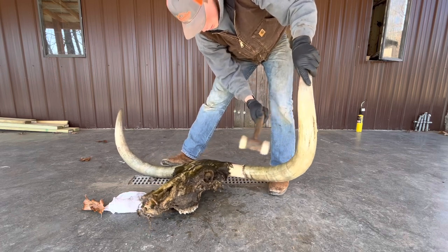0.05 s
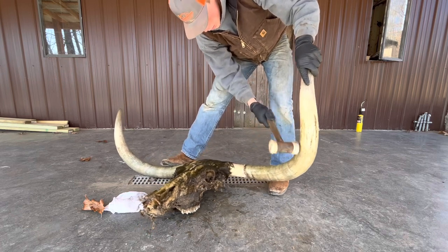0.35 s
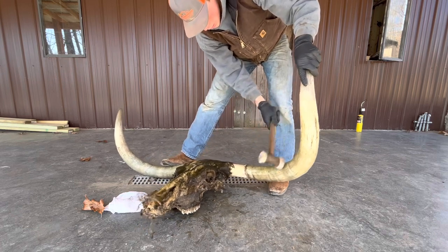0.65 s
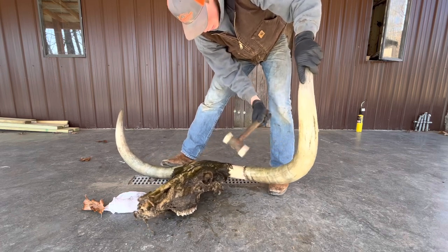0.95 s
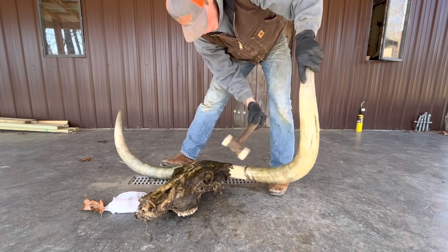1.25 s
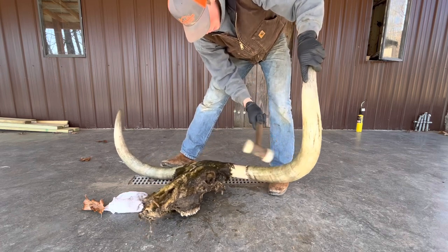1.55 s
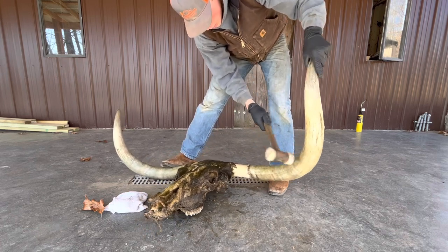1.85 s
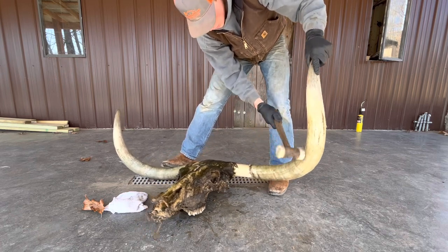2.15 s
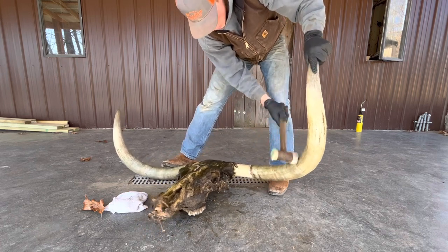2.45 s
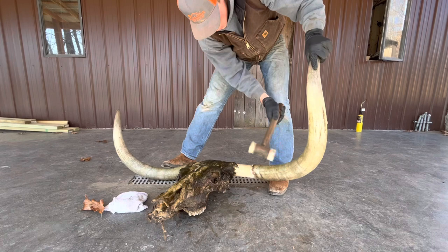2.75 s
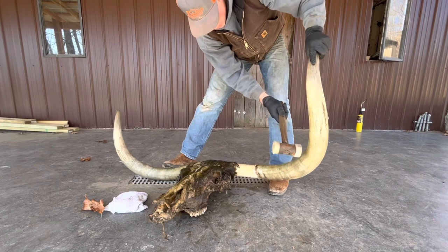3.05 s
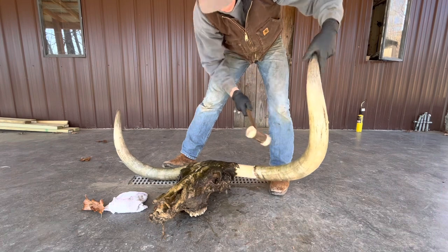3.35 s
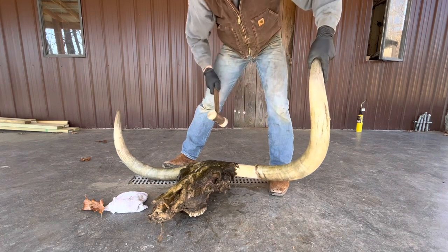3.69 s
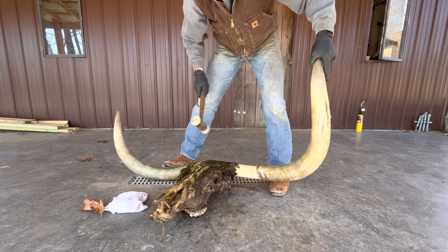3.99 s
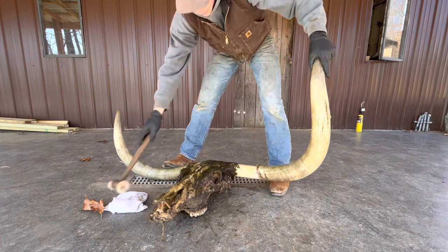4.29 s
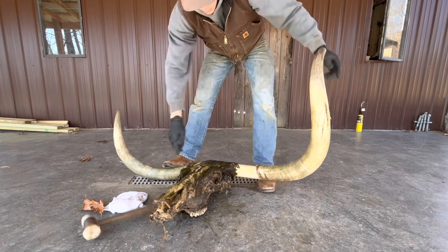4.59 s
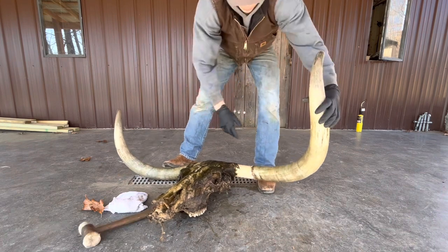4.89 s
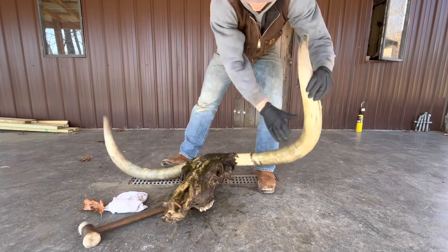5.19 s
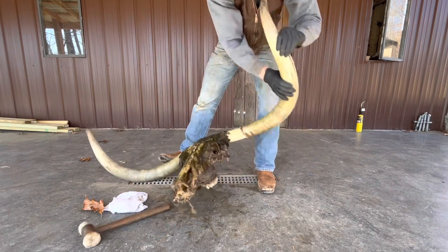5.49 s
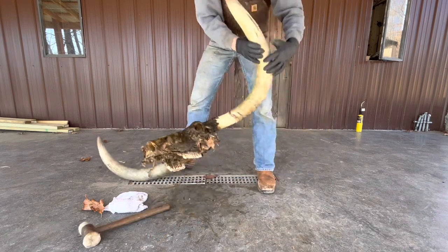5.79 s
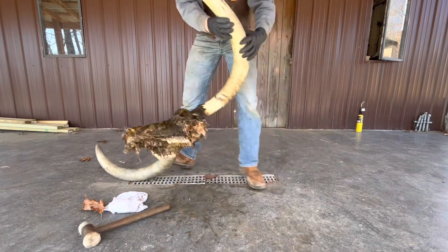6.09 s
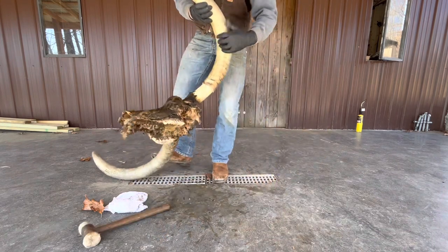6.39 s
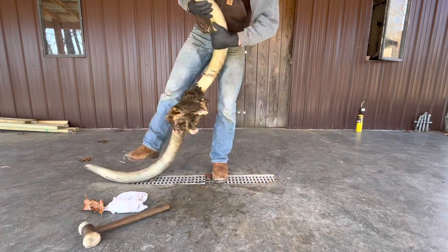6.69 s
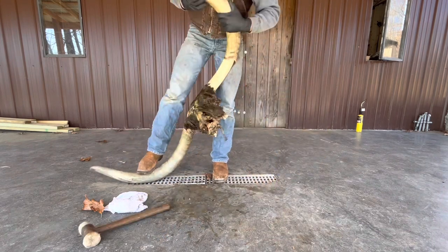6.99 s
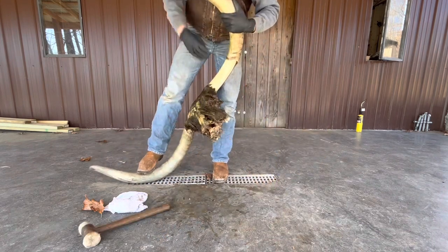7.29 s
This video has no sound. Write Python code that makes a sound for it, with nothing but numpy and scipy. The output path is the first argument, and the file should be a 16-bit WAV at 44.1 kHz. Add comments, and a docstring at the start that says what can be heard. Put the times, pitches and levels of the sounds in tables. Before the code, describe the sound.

Eight steady mallet blows on horn ring through a shed, followed by a dropped mallet and soft knocks, scrapes and clothing rustle.

```python
"""In a hard-walled shed, a cattle skull lies on concrete before a sheet-metal wall. A wooden mallet
strikes its horn eight times; each impact excites damped modes and drives the skull against the floor.
The skull rocks, the mallet drops and clatters, then the skull is lifted and swung round on the tip of
its other horn. Friction gives the noise of a drain grate, scrapes and work clothes, and grit snaps.
Reflections and reverberation answer each contact, over faint hiss and distant rumble."""
import sys
import numpy as np
from scipy import signal
from scipy.fft import rfft, irfft, next_fast_len
from scipy.io import wavfile
from scipy.ndimage import uniform_filter1d

SR = 44100
rng = np.random.default_rng(int(sys.argv[2]) if len(sys.argv) > 2 else 0)


def int16_out(signal):
    """Quantize to a 16-bit WAV file."""
    q = np.round(np.clip(np.atleast_2d(signal).T, -1, 1) * 32767)
    wavfile.write(sys.argv[1], SR, q.astype(np.int16))


N = 328104
TIME, HZ = np.arange(N) / SR, np.fft.rfftfreq(N, 1 / SR)
HIT = 16384  # samples in one impact
HIT_TIME, HIT_HZ = TIME[:HIT], np.fft.rfftfreq(HIT, 1 / SR)


# Each row: start in seconds, relative levels in dB of the blow, its thud, skull knock and treble crack,
# resonance of the struck spot in Hz, its lift in dB.
BLOWS = [(.2310, -1, -1.5, -8, -1.5, 1370, -1.5), (0.6383, 1, -6, -8.5, -3.5, 1180, -1),
         (1.014, -1.5, 0.5, -5.5, -0.5, 1310, 0), (1.3617, 0.5, -3.5, -6.5, -3, 1140, -2),
         (1.721, -1.5, -2, -3, 1, 1830, 0), (2.079, -3, .5, 0.5, 1, 2380, 4.5),
         (2.445, -4.5, .5, 0, 4.5, 2060, 5), (2.8094, -2.5, -1.5, -4.5, -3, 2160, 3)]
# Each row: frequency in Hz, relative level in dB, 60 dB decay time (T60) in seconds.
HORN_MODES = [(158, 1, 0.041), (204, 1, 0.024), (273, -1.5, 0.097), (339, -2, 0.11), (370.4, -3, 0.12),
              (430, -6.5, 0.081), (563, -6, 0.12), (638, -8, 0.041), (910, -29, 0.067), (1140, -2.5, 0.038),
              (1356, 3.5, 0.042), (1660, -9.5, 0.045), (1680, -5.5, 0.013), (2070, -17, 0.015),
              (2490, -35, 0.022), (2634, 9.5, 0.014)]
# Wood on horn. Each row, as in every SPECTRUM table: frequency in Hz, relative spectral density in dB.
CRACK_SPECTRUM = [(50, -20.5), (200, -10.5), (400, 0), (700, 2.5), (1700, 1.5), (2200, -1), (3000, -3.5),
                  (5200, -8.5), (7000, -4.5), (9000, -11), (12000, -14), (14000, -24), (16000, -61)]
# Each row: frequency in Hz, T60 in seconds.
CRACK_T60 = [(300, 0.028), (1500, 0.032), (4000, 0.027), (8000, 0.014)]

def horn_blows():
    """Impact excitation: a crack and the horn's modes. Returns direct sound and sound for the walls."""
    direct, spread, skull = np.zeros((3, 2, N))
    crack_db = curve(CRACK_SPECTRUM, HIT_HZ)
    common = decaying_noise(CRACK_T60, HIT)  # the part of the crack that all blows share
    contact = 1 - np.exp(-HIT_TIME / 0.00025)  # the mallet's face gives a little
    smooth_crack = unit(filtered(signal.unit_impulse(HIT), crack_db))  # ripple averaged over directions
    bass_db = -10 * np.log10(1 + (58 / (HIT_HZ + 5)) ** 6)  # a small body radiates little deep bass
    for start, db, thud_db, knock_db, treble_db, spot_hz, lift_db in BLOWS:
        modes = common + 1.92 * decaying_noise(CRACK_T60, HIT)
        crack = unit(coloured(modes * contact, crack_db, smooth_hz=645))
        horn = amp(7) * ring(HORN_MODES, scatter=0.35)
        shelf_db = treble_db * HIT_HZ ** 2 / (HIT_HZ ** 2 + 3500 ** 2)
        spot_db = lift_db / (1 + ((HIT_HZ - spot_hz) / 330) ** 2)
        tone_db = db + bass_db + shelf_db + spot_db
        add(direct, start, filtered(amp(14) * crack + horn, tone_db))
        add(spread, start, filtered(amp(10.5) * smooth_crack + amp(8.5) * crack + horn, tone_db))
        add(skull, start, skull_on_floor(db + knock_db, db + thud_db, bass_db))
        add(direct, start, wall_slaps(db))
    return direct + skull, spread + amp(-12.5) * skull


# The hollow knock. Each row: frequency in Hz, density in dB.
SKULL_SPECTRUM = [(60, -32), (130, -4), (170, 3), (230, -11), (280, -10), (340, -0.5), (440, 0.5),
                  (490, -10.5), (570, 3.5), (800, -17), (2000, -36), (8000, -62)]
# Each row: frequency in Hz, relative level in dB, T60 in seconds.
THUD_MODES = [(82, -1.5, 0.11), (117, 4.7, 0.071)]

def skull_on_floor(knock_db, thud_db, bass_db):
    """Momentum transfer: just after a blow the skull meets the floor with a hollow knock and a thud."""
    out = np.zeros((2, N))
    knock_lag_s, thud_lag_s = 0.01072, 0.01327
    knock = coloured(decaying_noise([(300, 0.052)], HIT), curve(SKULL_SPECTRUM, HIT_HZ), smooth_hz=80)
    thud = filtered(ring(THUD_MODES), bass_db)
    add(out, knock_lag_s, amp(knock_db + 16.5) * unit(knock))
    add(out, thud_lag_s, -amp(thud_db + 8) * unit(thud))
    return out


# Each row: start in seconds, relative levels in dB of head, handle and hollow bounce.
DROPS = [(4.534, 5, -10.5, -35), (4.562, 0, -14, -40), (4.6009, -26, 2.5, -31), (4.6135, -24, -6, -22),
         (4.637, -26, -3, -12.5), (4.7246, -3, -6, -40)]
# The mallet's two parts. Each row: frequency in Hz, density in dB.
HEAD_SPECTRUM = [(40, -23), (100, 7.5), (200, -5), (400, -0.5), (750, -0.5), (1100, 4.5), (1900, -15),
                 (2900, -11), (3700, 4.5), (4800, -14), (10000, -20.5), (15000, -35)]
HANDLE_SPECTRUM = [(100, -18), (600, -4.5), (1200, -4), (2500, 4.5), (4200, -0.5), (5700, -3), (7500, -12),
                   (10000, -18.5), (15000, -49)]
# Each row: frequency in Hz, relative level in dB, T60 in seconds.
HANDLE_MODES = [(1870, 0, 0.34), (2213, -23, 0.28), (2700, -23, 0.25), (2730, -10, 0.27), (3160, 0, 0.45),
                (4000, -14, 0.13), (4180, 29.5, 0.012), (5230, -1, 0.038)]

def dropped_mallet():
    """Rebound: the head lands and bounces, then the handle slaps the concrete and vibrates freely."""
    head, handle = np.zeros((2, 2, N))
    for start, head_db, handle_db, bounce_db in DROPS:
        add(head, start, amp(head_db + 1) * burst(curve(HEAD_SPECTRUM, HIT_HZ), t60=0.018))
        add(head, start, amp(bounce_db + 11.5) * ring([(343, 0, 0.032)]))
        slap = burst(curve(HANDLE_SPECTRUM, HIT_HZ), t60=0.018)
        add(handle, start, amp(handle_db + 5) * (slap + amp(-6.5) * ring(HANDLE_MODES, scatter=0.2)))
    leftward = amp([[0.34], [-0.34]])
    return head * leftward, handle * leftward


# Each row: start in seconds, relative level in dB, hollow pitch in Hz, brightness in dB.
BUMPS = [(3.080, -2.5, 347, -6.5), (3.118, -7, 302, 5), (3.525, -12, 404, -7), (3.82, -7, 345, 8),
         (3.94, -5, 350, -5), (3.992, -4.5, 291, -40), (4.852, -6.5, 515, 2), (5.035, -2, 160, -9),
         (6.167, -3.5, 262, 8), (6.185, 2, 347, -1), (6.491, 0.5, 280, -25), (6.706, -1, 380, -16),
         (6.758, 0, 398, 17), (6.828, -2, 361, 13), (7.404, -9.5, 201, 2)]
# Each row: frequency in Hz, density in dB.
BUMP_SPECTRUM = [(40, -30.5), (100, -7.5), (180, -3.5), (450, -5.5), (750, -14.5), (1800, -16),
                 (3500, -29.5), (12000, -40.5), (16000, -63)]

def bumps():
    """Compliant contact: rocking skull and boots build force slowly, giving a dull push and one mode."""
    out = np.zeros((2, N))
    envelope = (1 - np.exp(-HIT_TIME / 0.0027)) * amp(-60 * HIT_TIME / 0.057)
    for start, db, hollow_hz, bright_db in BUMPS:
        tone_db = curve(BUMP_SPECTRUM, HIT_HZ) + bright_db * HIT_HZ / (HIT_HZ + 900)
        push = unit(coloured(noise(HIT) * envelope, tone_db, smooth_hz=152))
        hollow = ring([(hollow_hz, 0, 24 / hollow_hz)])
        add(out, start, amp(db - 9) * (push + amp(-2.5) * hollow))
    return out


# Each row: start in seconds, relative level in dB, pitch in Hz.
SNAPS = [(3.04, -19, 4300), (3.321, -21, 1070), (3.529, -26, 1530), (4.491, -18, 1770), (5.789, -7.5, 7800),
         (6.263, -9, 8100), (6.819, 2, 5600), (6.865, -12, 9000), (6.938, -6, 3800), (7.395, -14, 2580)]

def grit_snaps():
    """Hard contact: grit cracks on concrete with a broad spectral peak and a brief ring."""
    out = np.zeros((2, N))
    lowpass_db = -10 * np.log10(1 + (HIT_HZ / 12500) ** 24)
    for start, db, pitch_hz in SNAPS:
        peak_db = -13 * np.log10(1 + np.log2((HIT_HZ + 20) / pitch_hz) ** 2)
        ping = ring([(pitch_hz, 0, 45 / pitch_hz)])  # dies in 45 cycles
        add(out, start, amp(db - 7) * (burst(peak_db + lowpass_db, t60=0.028) + amp(-16.5) * ping))
    return out


# Each row: start in seconds, relative level in dB.
TAPS = [(6.821, -9), (6.835, -8), (6.938, -6.5)]
# Each row: frequency in Hz, relative level in dB, T60 in seconds.
TIP_MODES = [(580, -8, .1), (760, -7, .05), (1070, 0, 0.037), (1510, 8, 0.058), (2050, -13, .1)]

def tip_taps():
    """Free vibration: the lower horn's tip scuffs the floor and sounds its hollow note."""
    out = np.zeros((2, N))
    for start, db in TAPS:
        note = ring(TIP_MODES, scatter=0.14)
        scuff = burst(curve(SCRAPE_SPECTRUM, HIT_HZ), t60=0.032)
        add(out, start, amp(db) * (amp(-5) * note + amp(-0.5) * scuff))
    return out


# Each row: peak time in seconds, relative level in dB, length in seconds.
SCRAPES = [(5.66, -60.5, 1), (6.395, -48, 0.078), (6.51, -54.5, 0.19), (6.82, -46, 0.11),
           (7.405, -49, 0.056)]
# Each row: frequency in Hz, density in dB.
SCRAPE_SPECTRUM = [(100, 4), (500, 10), (800, 12), (1200, 0), (1900, 9.5), (2800, 2), (5000, -2.5),
                   (7000, -8), (14000, -16)]

def scrapes():
    """Sliding friction: horn tip and soles drag over concrete and give grainy noise."""
    gain = strokes(SCRAPES, rise=0.45, shape=1.4)
    return amp(6.5) * stream(curve(SCRAPE_SPECTRUM, HZ), gain, grit=0.4)


# Each row: peak time in seconds, relative level in dB, length in seconds.
GRATE_DRAGS = [(5.035, -43.5, 0.035), (5.124, -38, 0.22)]
# Each row: frequency in Hz, bandwidth in Hz, relative level in dB.
GRATE_MODES = [(540, 170, 1), (910, 57, 5), (1020, 70, -17), (1330, 74, -1), (1690, 120, 4.5),
               (1770, 55, 5), (2170, 190, -4), (2730, 79, 5), (3280, 370, -7.5), (4220, 450, -15),
               (5100, 600, -6)]

def drain_grate():
    """Forced resonance: the skull catches on the steel grate and drags off it, driving its modes."""
    power = sum(amp(db) ** 2 / (1 + (2 * (HZ - hz) / width) ** 2) for hz, width, db in GRATE_MODES)
    gain = strokes(GRATE_DRAGS, rise=0.025, shape=1.77)
    return amp(-5) * stream(10 * np.log10(power), gain, grit=0.23)


# Moves of arms and legs. Each row: peak time in seconds, relative level in dB, length in seconds.
RUSTLES = [(3.26, -55.5, 0.12), (3.395, -54, 0.084), (4.41, -56.5, 0.3), (4.83, -50, 0.094),
           (4.935, -52.5, 0.063), (5.28, -61, 0.32), (5.555, -45.5, 0.097), (5.63, -53, .07),
           (5.803, -46, 0.12), (6.25, -56, 0.41), (6.51, -49.5, 0.3), (6.78, -42.5, 0.29),
           (7.165, -52, 0.064), (7.435, -45, 0.051)]
# The soft stir between moves. Each row: time in seconds, relative level in dB.
STIR_LEVELS = [(3.8, -75.5), (4.4, -66), (7.44, -71)]
# Each row: frequency in Hz, density in dB.
CLOTH_SPECTRUM = [(300, -5), (2000, -6), (4500, 0), (6500, -0.5), (9000, 0.5), (12500, -4), (14000, -8),
                  (16000, -51)]

def clothes():
    """Friction of cloth: bright noise swells with each move of the worker."""
    gain = strokes(RUSTLES, rise=0.43, shape=1.55) + level(STIR_LEVELS)
    return amp(-0.5) * stream(curve(CLOTH_SPECTRUM, HZ), gain, grit=0.31)


# Each row: delay in seconds, relative level in dB, centre in Hz, half-width in Hz, T60 in seconds.
WALL_SLAPS = [(0.054, -4.5, 1770, 350, 0.034), (.148, -10, 600, 167, .1)]

def wall_slaps(blow_db):
    """Selective reflection: each wall returns a blow in one band, the ribbed bright, the far dull."""
    out = np.zeros((2, N))
    for delay, db, centre, width, t60 in WALL_SLAPS:
        band_db = -20 * np.log10(1 + ((HIT_HZ - centre) / width) ** 2)
        add(out, delay, amp(blow_db + db) * burst(band_db, t60))
    return out


# Each row: delay in seconds, left gain, right gain.
REFLECTIONS = [(.0022, 0.19, 0.18), (.0048, 0.32, .1), (0.0113, .2, .15), (0.0158, 0.28, 0.59),
               (0.0164, .3, .15), (0.0336, 0.16, 0.057)]
# Each row: frequency in Hz, T60 in seconds.
SHED_T60 = [(80, 0.96), (250, .5), (600, 0.95), (1500, 0.53), (4000, 0.57), (8000, 0.5), (14000, 0.3)]
# Each row: frequency in Hz, density in dB.
TAIL_SPECTRUM = [(50, 12), (120, 3), (250, 6), (500, 5.5), (1500, 5), (4000, 2.5), (7000, -3.5),
                 (10000, -2.5), (13000, -13.5)]

def shed(x):
    """Reverberation: early reflections, then a diffuse tail that shifts as the worker moves about."""
    size, tails, cycle_s = 32768, 6, 2.2
    t = TIME[:size]
    onset = np.clip((t - 0.009) / 0.003, 0, 1)
    swell = onset * (1 + 9.3 * np.exp(-t / 0.049))  # the near wall answers first and strongest
    dull_pulse = signal.lfilter([0.5], [1, -0.5], signal.unit_impulse(32))
    early = np.zeros((2, size))
    for delay, left, right in REFLECTIONS:
        add(early, delay, np.outer([left, right], dull_pulse))
    out = signal.oaconvolve(x, early, axes=1)[:, :N]
    tail_db = curve(TAIL_SPECTRUM, bins(size))
    for offset in np.arange(tails) / tails:
        tail = coloured(decaying_noise(SHED_T60, size) * swell, tail_db, smooth_hz=60)
        phase = (TIME / cycle_s + offset) % 1
        crossfade = np.sqrt(np.clip(1 - tails * abs(phase - 0.5), 0, 1))
        out += signal.oaconvolve(x * crossfade, tail, axes=1)[:, :N]
    return out


# Each row: frequency in Hz, density in dB.
OPENING_SPECTRUM = [(100, -18), (330, 1.5), (450, -10.5), (680, -4), (1000, -11), (3000, -24), (10000, -49)]

def opening_ring():
    """Reverberant decay: as the scene opens, the shed still rings from an earlier blow."""
    out = np.zeros((2, N))
    tail = coloured(decaying_noise([(300, 0.43)], HIT), curve(OPENING_SPECTRUM, HIT_HZ), smooth_hz=150)
    add(out, 0, amp(-6) * unit(tail))
    return out


# Each row: peak time in seconds, level in dB, length in seconds.
PUFFS = [(6.31, -49, 0.089), (6.54, -49.5, 0.38), (6.85, -51, 0.63), (7.2, -45, 0.21), (7.32, -37, 0.044),
         (7.42, -46, 0.2)]
# Each row: frequency in Hz, density in dB.
PUFF_SPECTRUM = [(20, -15), (45, 1.5), (75, 2), (130, -20), (300, -40), (1000, -77)]

def air_puffs():
    """Air displacement: the swung skull sends low puffs of pressure to the microphones."""
    return stream(curve(PUFF_SPECTRUM, HZ), strokes(PUFFS, rise=0.61, shape=2.5))


# Each row: frequency in Hz, density in dB.
HISS_SPECTRUM = [(40, -40), (150, -2.5), (350, -1), (700, -6), (1400, -8), (2500, -10.5), (4200, -9),
                 (9000, -15.5), (13000, -30.5), (14400, -50), (16000, -74.5)]
RUMBLE_SPECTRUM = [(20, -51), (40, -22), (65, -2), (100, -2.5), (160, -9.5), (250, -17), (500, -26.5),
                   (2000, -56)]
# Each row: time in seconds, level in dB.
HISS_LEVELS = [(0, -53), (3.6, -57.5), (4.4, -54.5), (7.45, -52.5)]
RUMBLE_LEVELS = [(0, -51.5), (2.9, -50.5), (3.7, -55.5), (4.4, -56), (5.4, -54.5), (7.45, -54.5)]

def background():
    """Ambient noise: the hiss of the air and a distant rumble drift slowly in level."""
    hiss = stream(curve(HISS_SPECTRUM, HZ), level(HISS_LEVELS))
    rumble = stream(curve(RUMBLE_SPECTRUM, HZ), level(RUMBLE_LEVELS))
    return hiss + rumble


# Each row: frequency in Hz, left-right correlation.
COHERENCE = [(30, .1), (70, 0.94), (150, 0.95), (300, 0.8), (600, 0.23), (4000, 0.061), (9000, 0.076),
             (12000, 0.93)]

def noise(size):
    """Partial coherence: white noise at two microphones, alike in the bass, unlike in the middle."""
    full = 2 * next_fast_len(size // 2 + 1)
    left, other = rfft(rng.standard_normal((2, full)))
    alike = curve(COHERENCE, bins(full))
    right = alike * left + np.sqrt(1 - alike ** 2) * other
    return irfft(np.array([left, right]))[:, :size]

def decaying_noise(t60_rows, size):
    """Modal overlap: dense modes merge into noise whose bands decay by rows of (Hz, T60 in seconds)."""
    hz, t, bands = signal.stft(noise(size), SR, nperseg=128)
    decay = amp(-60 * t / curve(t60_rows, hz)[:, None])
    return signal.istft(bands * decay, SR, nperseg=128)[1][:, :size]

def burst(db, t60):
    """Exponential decay: a noise knock of unit energy with spectrum db."""
    return unit(coloured(noise(HIT) * amp(-60 * HIT_TIME / t60), db, smooth_hz=214))

def ring(modes, scatter=0):
    """Superposition of damped sines (Hz, dB, T60 in seconds); scatter varies their level and pitch."""
    out = np.zeros(HIT)
    for k, (hz, db, t60) in enumerate(modes):
        strength, detune = rng.standard_normal(2) * scatter
        envelope = amp(db + 20 * strength - 60 * HIT_TIME / t60)
        out += (-1) ** k * envelope * np.sin(2 * np.pi * hz * (1 + detune / 10) * HIT_TIME)
    return unit(out)

def stream(db, gain, grit=0):
    """Amplitude modulation: noise of spectrum db follows a gain; grit (0-1) is the share of grains."""
    grains_per_s = 500
    carrier = noise(N)
    pulses = np.minimum(rng.exponential(1, N), 2) ** 2 * (rng.random(N) < grains_per_s / SR)
    grains = carrier * uniform_filter1d(pulses, 20)
    blend = (1 - grit) * unit(noise(N)) + grit * unit(grains)
    return unit(irfft(rfft(blend) * amp(db), N)) * np.sqrt(N) * gain

def strokes(rows, rise, shape):
    """Envelopes: each move swells from -20 dB for the share rise of its length, then fades back."""
    gain = np.zeros(N)
    for peak_s, db, length in rows:
        offset = (TIME - peak_s) / length
        distance = np.maximum(-offset / rise, offset / (1 - rise))
        gain += amp(db - 20 * np.minimum(distance, 10) ** shape)  # shape 1 is sharp, 2 is round
    return gain

def coloured(x, db, smooth_hz):
    """Spectral whitening, then filtering: x takes the broad spectrum db and keeps its fine ripple."""
    power = np.mean(abs(rfft(x)) ** 2, 0)
    broad_power = uniform_filter1d(power, max(int(smooth_hz * x.shape[-1] / SR), 1))
    return filtered(x, db - 10 * np.log10(broad_power + 1e-12))

def filtered(x, db):
    """Minimum phase: a causal filter with gain db at each frequency."""
    size, log_gain = x.shape[-1], np.log(amp(db))
    causal_cepstrum = irfft(log_gain) * 2 * (np.arange(size) < size // 2)
    phase = rfft(causal_cepstrum).imag
    return irfft(rfft(x) * np.exp(log_gain + 1j * phase))

def level(rows):
    """Interpolation in decibels: a gain over time."""
    return amp(np.interp(TIME, *np.transpose(rows)))

def curve(rows, hz):
    """Interpolation over log frequency."""
    freqs, values = np.transpose(rows)
    return np.interp(np.log(hz + 1), np.log(freqs), values)

def bins(size):
    """Fourier frequencies in Hz for this many samples."""
    return np.fft.rfftfreq(size, 1 / SR)

def amp(db):
    """Amplitude ratio from decibels."""
    return 10 ** (np.asarray(db) / 20)

def unit(x):
    """Normalisation to a mean energy of 1 per channel."""
    return x / np.sqrt(np.mean(np.sum(x ** 2, -1)) + 1e-20)

def add(mix, start, sound):
    """Superposition: a sound joins the mix at start seconds."""
    part = mix[:, round(start * SR):][:, :sound.shape[-1]]
    part += sound[..., :part.shape[1]]


def scene():
    """Direct and reverberant fields add; each source feeds the shed with its own strength."""
    blows, spread = horn_blows()
    head, handle = dropped_mallet()
    thumps = bumps()
    clicks = grit_snaps() + tip_taps()
    friction = drain_grate() + scrapes() + clothes()
    direct = blows + head + handle + thumps + clicks + friction
    to_walls = (amp(-1.63) * spread + amp(-7) * (head + thumps) + amp(1) * handle
                + amp(-10) * clicks + amp(-6.5) * friction)
    return direct + shed(to_walls) + opening_ring() + air_puffs() + background()


# Each row: frequency in Hz, level of the left microphone over the right in dB.
BALANCE = [(60, -0.5), (250, 1), (500, 0), (1000, 2.5), (2000, -0.5), (4000, 7), (8000, 0), (12000, -2)]

def record(dry):
    """Transduction: the microphones differ in colour, peaks saturate softly and the band is limited."""
    balance_db = np.outer([0.5, -0.5], curve(BALANCE, HZ))
    heard = irfft(rfft(dry) * amp(balance_db), N)
    rounded = heard / (1 + heard ** 4) ** (1 / 4)
    lowpass = signal.firwin(255, cutoff=16300, window=("kaiser", 9), fs=SR)
    return signal.oaconvolve(rounded, lowpass[None], "same")


dry = scene()
out = record(dry)
int16_out(out)
```